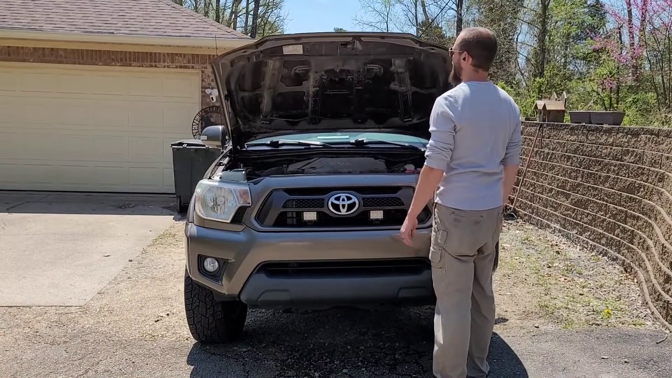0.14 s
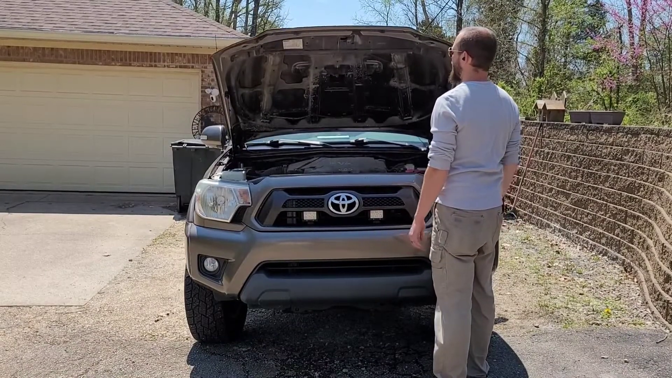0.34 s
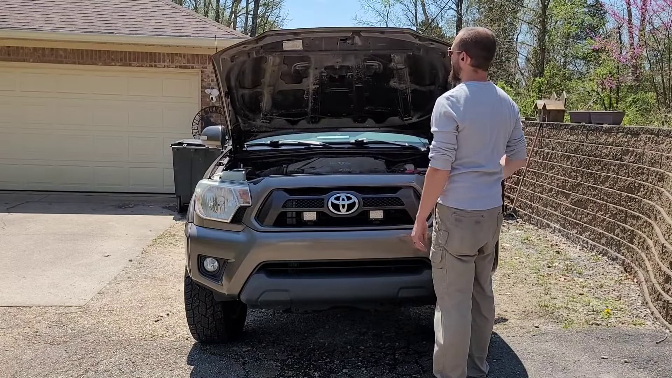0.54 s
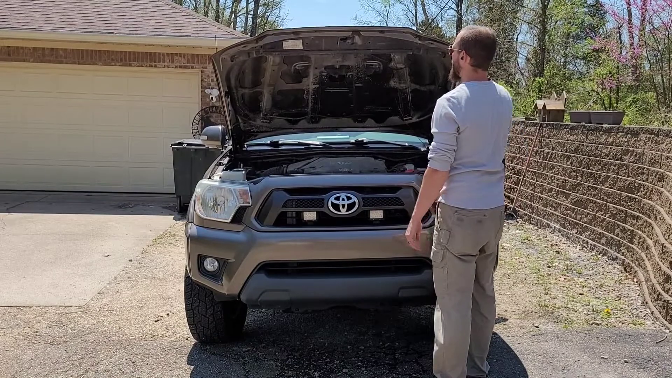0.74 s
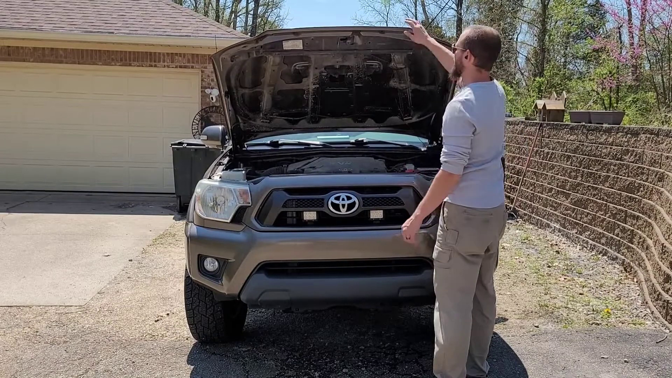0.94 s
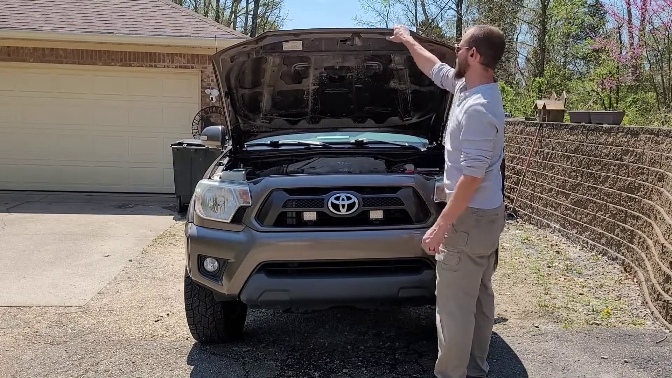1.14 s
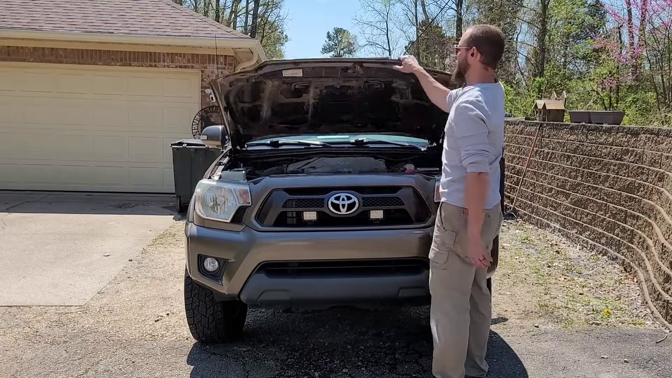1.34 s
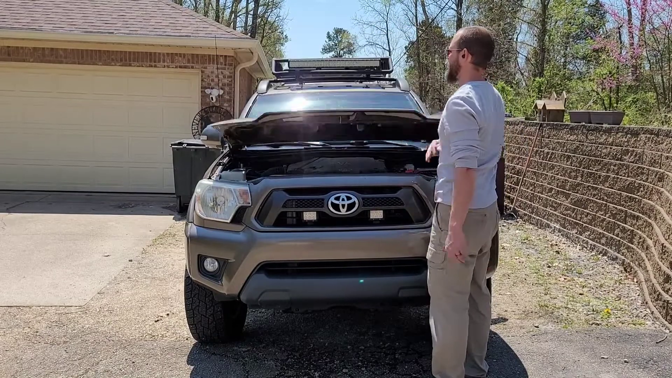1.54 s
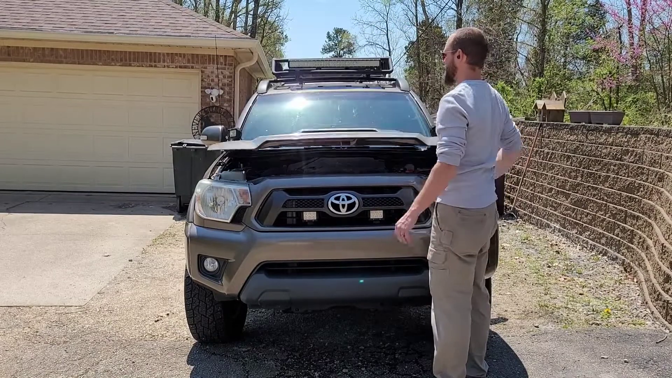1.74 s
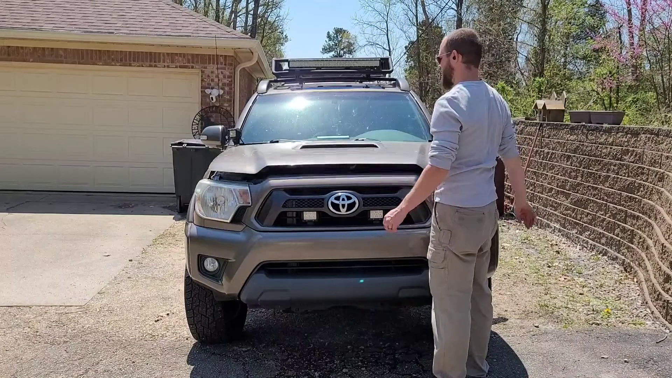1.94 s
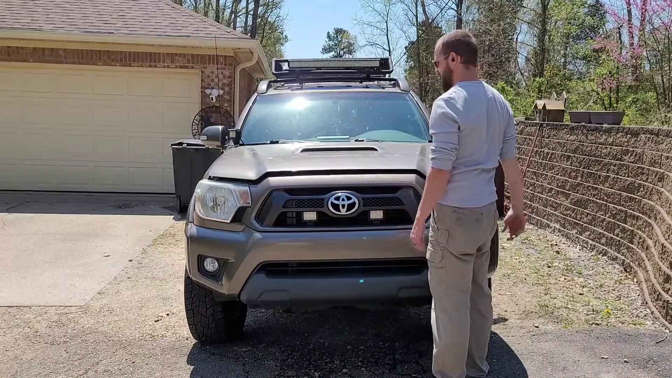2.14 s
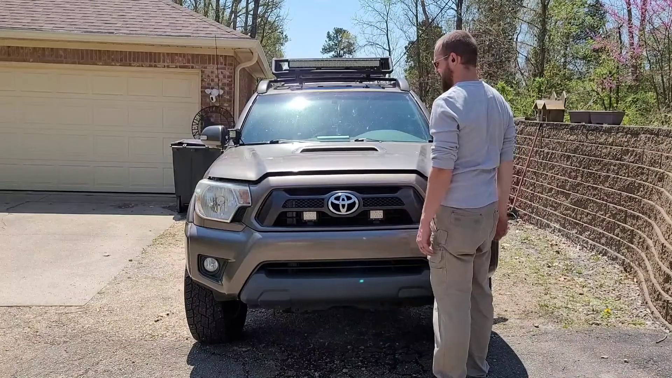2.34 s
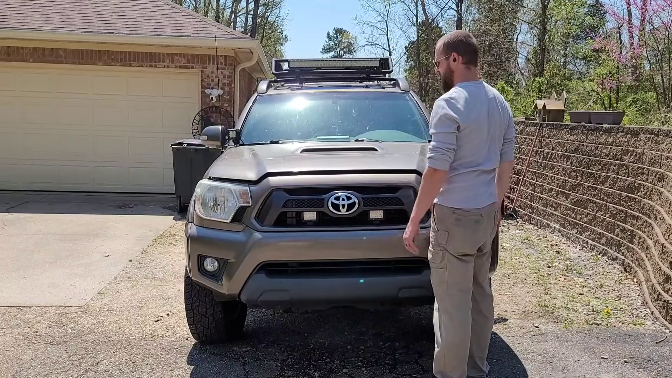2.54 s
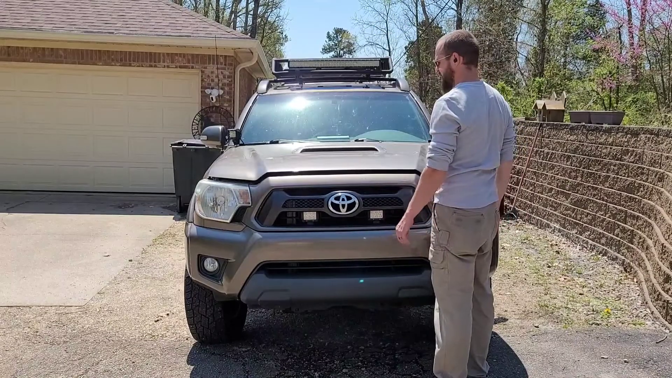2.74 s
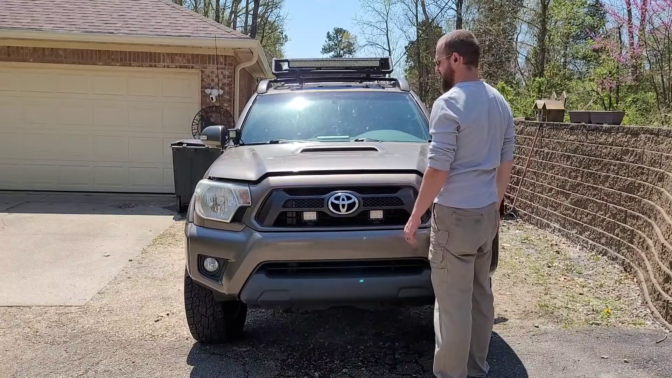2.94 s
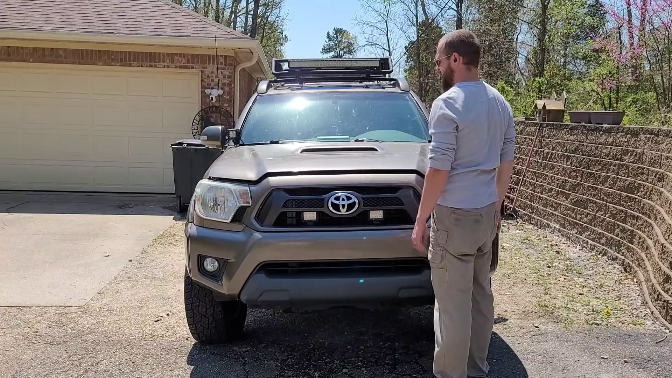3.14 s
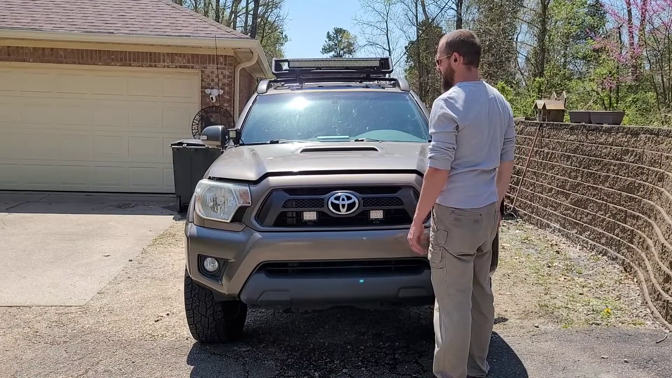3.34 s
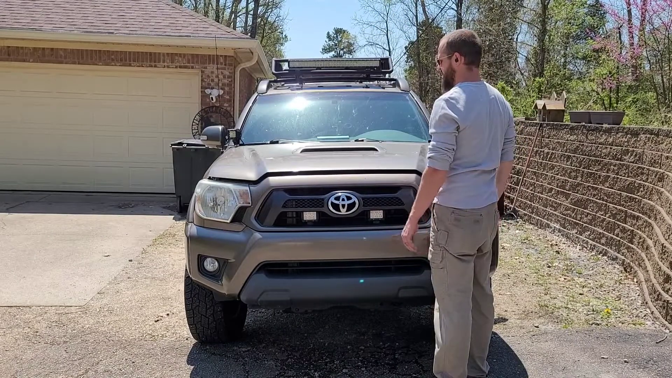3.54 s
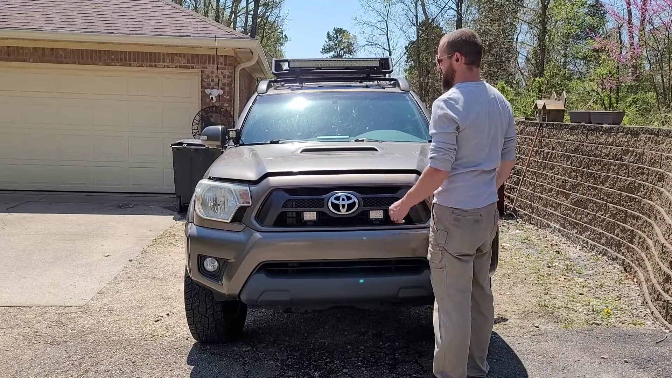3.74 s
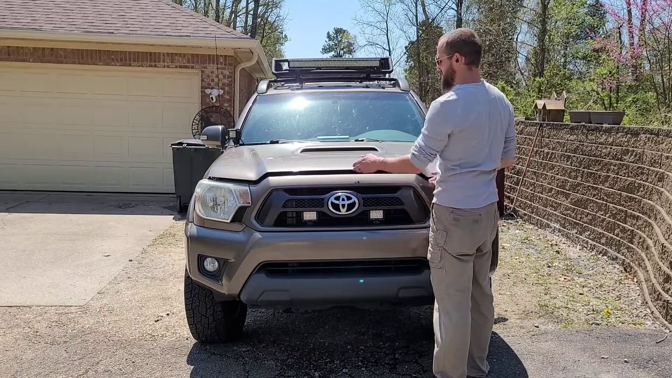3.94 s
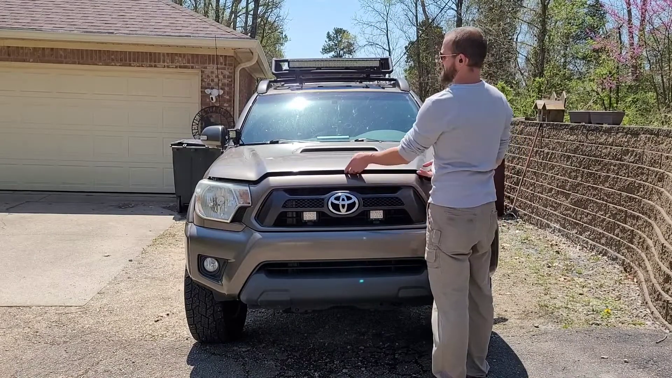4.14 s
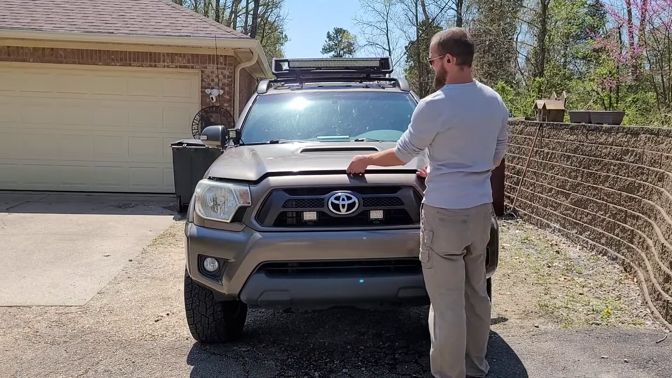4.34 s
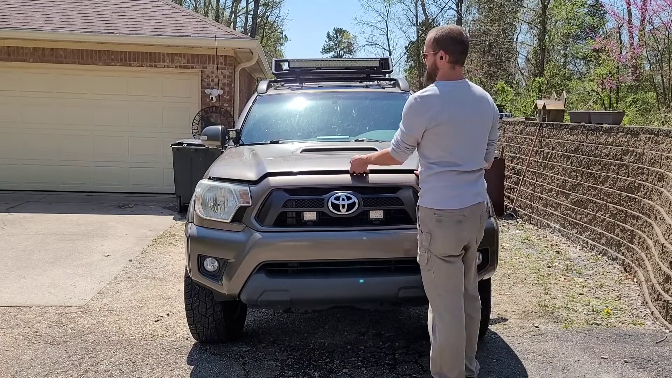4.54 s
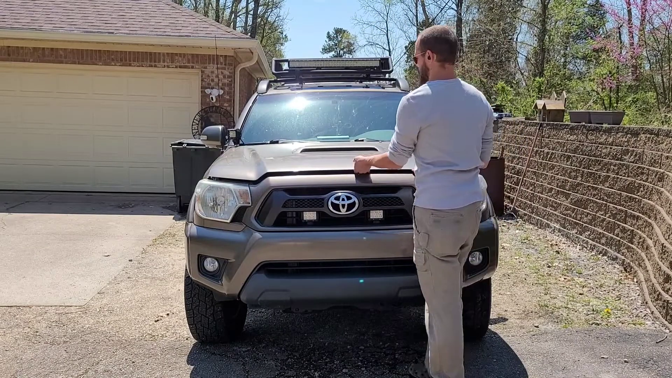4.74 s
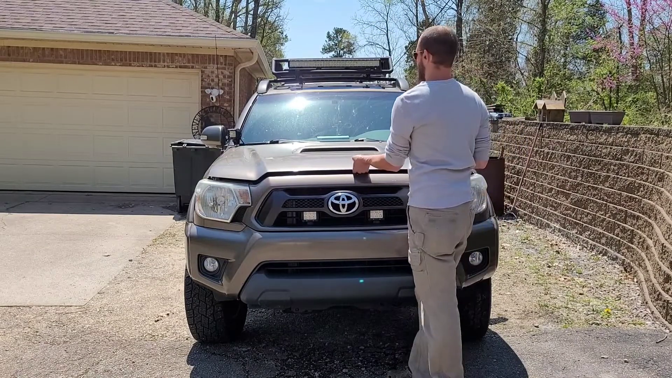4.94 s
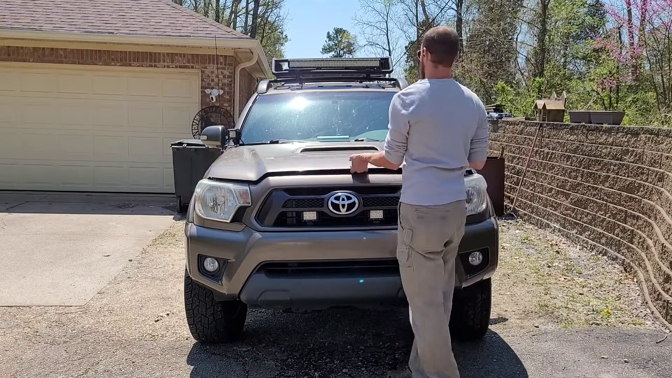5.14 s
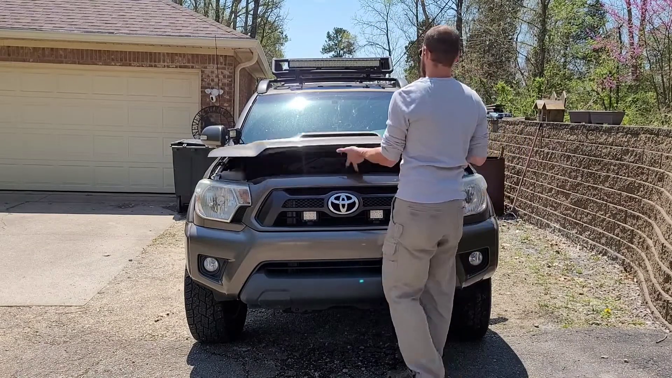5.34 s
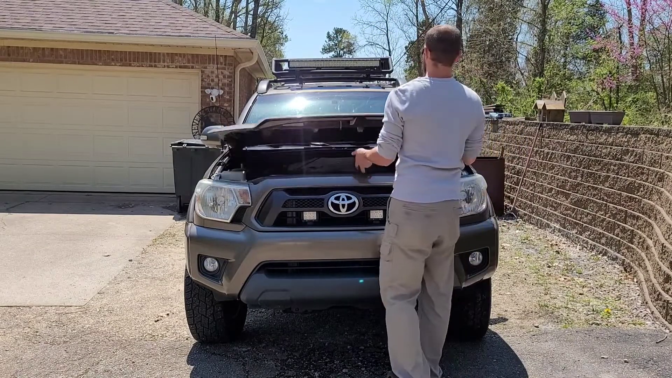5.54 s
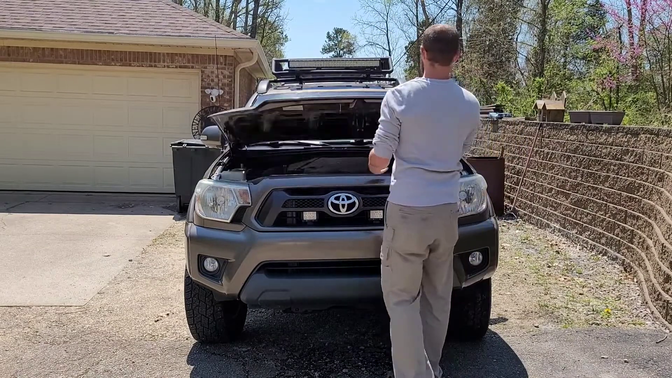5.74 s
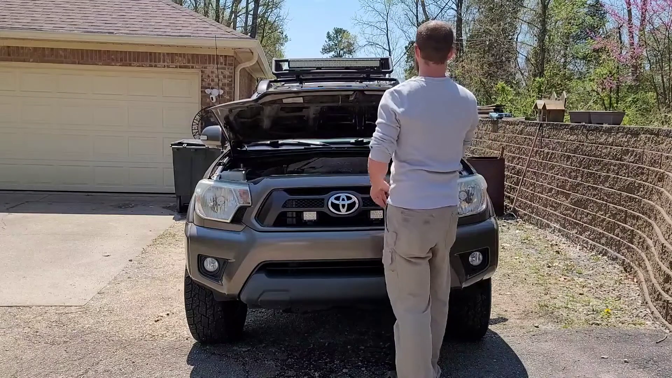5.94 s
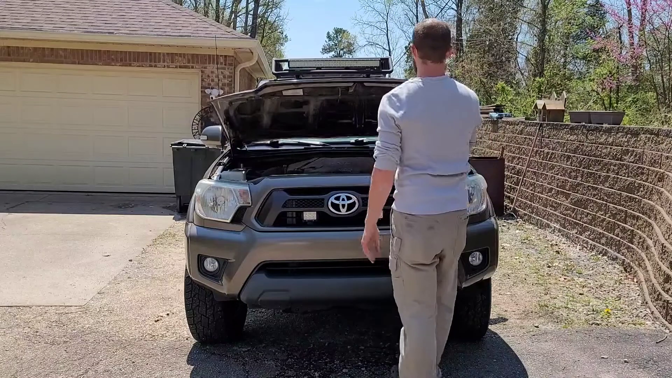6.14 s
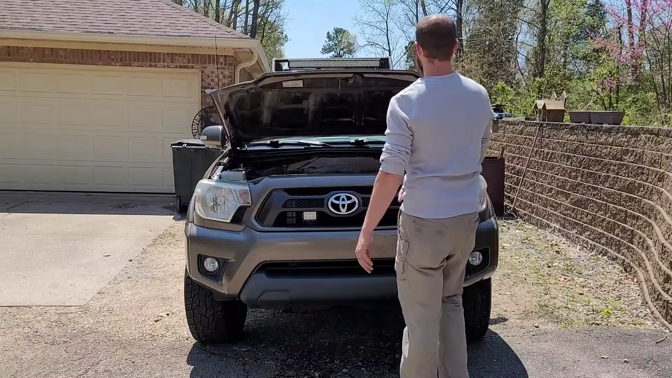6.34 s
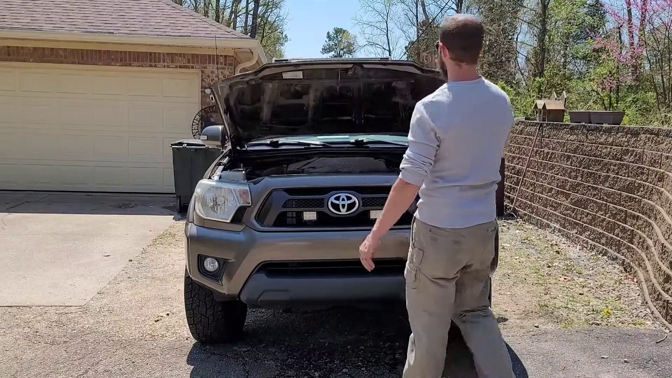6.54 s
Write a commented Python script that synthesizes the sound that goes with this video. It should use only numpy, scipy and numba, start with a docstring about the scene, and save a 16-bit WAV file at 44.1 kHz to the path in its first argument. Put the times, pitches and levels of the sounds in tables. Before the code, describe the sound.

Heard by a phone a few metres away outdoors: low soft bumps on sheet metal, a firmer knock, a short squeak, then a deep, loud hood bang with a clattering ring and scattered echo. Faint birds and a distant murmur follow. Light latch ticks and tiny squeaks lead to a moderate metal pop, soft strut hiss and scuffs, ending with a crisp click and a little low breeze.

```python
"""Birds whistle and chip beside scuffs and a breeze on the microphones; then knocks ring a steel truck hood.
It is pulled down and slammed, unlatched by hand and lifted again, a few metres from a phone.
Rattling contacts drive decaying sheet-metal modes; gliding tones make the latch squeaks and the birds.
Shaped noise makes strut hiss, scuffs, breeze and a far town murmur with a hum.
A garage wall and a scattered yard tail throw hood and birds back."""
import sys
import numpy as np
from scipy import signal
from scipy.fft import rfft, irfft, next_fast_len
from scipy.io import wavfile
from scipy.ndimage import uniform_filter1d
from numba import njit

SR = 44100
rng = np.random.default_rng(int(sys.argv[2]) if len(sys.argv) > 2 else 0)


def convert_level_to_amplitude(level_db):
    """Map a level in decibels to its linear amplitude factor."""
    exponent = np.asarray(level_db, float) / 20
    return 10 ** exponent


def output_pcm(signal):
    """Save a mono or channel-first signal as 16-bit PCM at the path in sys.argv[1].

    Samples are clipped to [-1, 1] before scaling.
    """
    pcm = np.clip(np.atleast_2d(signal).T, -1, 1) * 32767
    wavfile.write(sys.argv[1], SR, np.round(pcm).astype(np.int16))


N = 291314
T = np.arange(N) / SR
# borders of the four parts of the metal, low to high: front end, drum, panel, clank: edge_hz
PART_EDGES_HZ = (18, 160, 700, 2000, 4300)


def unit(x):
    """Scale to rms 1."""
    return x / np.sqrt(np.mean(x ** 2))


def colour(x, points):
    """Filter by a spectrum of (hz, db) points, joined straight over log frequency."""
    hz, db = np.transpose(points)
    size = next_fast_len(N)
    f = np.maximum(np.arange(size // 2 + 1) * SR / size, 1)
    gain = convert_level_to_amplitude(np.interp(np.log(f), np.log(hz), db))
    return irfft(rfft(x, size) * gain, size)[..., :N]


def walk(rate):
    """Random levels held 1 / rate s and slewed twice."""
    k = int(SR / rate)
    steps = np.repeat(rng.standard_normal(N // k + 1), k)
    return 1.3 * uniform_filter1d(uniform_filter1d(steps, k), k)[:N]


def sides(pan_db):
    """Left and right gains; pan_db is left minus right."""
    return convert_level_to_amplitude(np.array([pan_db, -pan_db]) / 2)


def fade(t, t60_s):
    """Exponential decay by 60 dB in t60_s."""
    return np.exp(-np.log(1000) * t / t60_s)


def swells(rows):
    """Gain over time: swells build and fade at steady dB rates, and their powers add."""
    t = T[::44]
    power = 0
    for s, db, rise, fall in rows:
        drop_db = np.where(t < s, rise * (s - t), fall * (t - s))
        power = power + convert_level_to_amplitude(db - drop_db) ** 2
    return np.interp(T, t, np.sqrt(power))


def notes(rows, waver, flutter_db, count=1):
    """Gliding notes, quick at first and then level, that waver in pitch and strength."""
    overtone_top_hz = 3600
    out, wobble = np.zeros(N), 1 + waver * walk(110)
    for s, length, from_hz, to_hz, db, *step_db in rows:
        i, u = int(s * SR), np.linspace(0, 1, int(length * SR))
        hz = (to_hz + (from_hz - to_hz) * (1 - u) ** 2) * wobble[i:i + len(u)]
        phase = 2 * np.pi * np.cumsum(hz) / SR
        tone = np.sin(phase)
        for k in range(2, count + 1):
            if k * to_hz < overtone_top_hz:
                tone += convert_level_to_amplitude(k * step_db[0]) * np.sin(k * phase)
        out[i:i + len(u)] += convert_level_to_amplitude(db) * np.sqrt(2) * np.sin(np.pi * u) ** 0.18 * tone
    return out * convert_level_to_amplitude(flutter_db * walk(70))


def contacts():
    """Knocks and taps in time order; a harder contact feeds the higher parts of the metal more."""
    # knocks on the hood: start_s, strength_db, hardness_db, damping_x,
    # note_hz of the struck spot, note_db over the strength
    knocks = [(0.296, -40.5, -22.5, 0.54, 327, -1.5), (0.317, -36.5, -31, 0.69, 327, 10),
              (0.374, -35.5, -37, 1.35, 351.5, 2.5), (0.439, -46, -33, 1.08, 312, 4.5),
              (1.063, -28.5, -19, 1.12, 1300, -5), (1.078, -26.5, -34, 1.18, 686, 2),
              (1.149, -36, -55, 1.54, 657, 4), (1.956, -18, -6, 0.71, 377, 1),
              (1.984, -12.5, 3.5, 1.52, 374, 5), (2.003, -12, -11, 2.56, 383, 2),
              (2.034, -21, -10.5, 0.6, 371.7, 0.5), (2.09, -22.5, 0.5, 4.8, 364, 4),
              (2.159, -26, 1.5, 1.14, 372, 9), (2.19, -35, -12, 1.3, 885, 15),
              (2.249, -31.5, -22, 1.55, 376, 9), (4.019, -49, -12, 2.64, 490, 0.5),
              (4.19, -48, 2, 1.6, 573, 8.5), (4.53, -60, -2, 1.7, 845, 11.5),
              (4.952, -37, -16, 1.53, 536, -0.5), (5.092, -39.5, -17.5, 1.3, 183, 2),
              (5.466, -24.5, -8, 1.85, 363, -0.5), (5.475, -25, -9.5, 2.17, 430, 12.5),
              (5.495, -46, -25, 1.95, 536.5, 23.5), (5.509, -38.5, -44, 2.36, 215, 16.5),
              (5.618, -69, 10.5, 2.1, 319, 23), (6.579, -71.5, 13, 4.2, 250, 24)]
    # rows for drum, panel, clank and tick: over_db (over the strength), share (of hardness_db)
    hardness = [(-1, 0.0024), (2, 0.19), (-1, .6), (0.5, 1)]
    # light taps of fingers, latch and stay: start_s, panel_db, clank_db, tick_db, damping_x
    taps = [(0.669, -62, -60, -85, 1.8), (1.376, -58, -50, -53.5, 0.57), (1.417, -54, -51.5, -51, 1.5),
            (1.5, -61.5, -66.5, -61.5, 1.6), (4.175, -49, -41.5, -63.5, 1.2), (4.454, -55, -56.5, -53, 1.4),
            (4.473, -54, -47, -69, 2), (4.55, -71, -50, -55, 2.04), (4.605, -54, -64.5, -61, 0.9),
            (4.699, -56.5, -78, -68, 2.9), (5.238, -69, -57, -62, 0.97), (5.265, -73, -59, -60, 2.6),
            (5.394, -58.5, -47.5, -47, 0.85), (5.449, -60, -61, -45, 3.2),
            (5.727, -68.5, -58.5, -65.5, 1.3), (6.329, -67, -61.5, -64, 1.75),
            (6.535, -53.5, -55.5, -52, 0.77), (6.567, -62, -63.5, -41.5, 2.8)]
    knock_pan_db, tap_pan_db, tap_drum_db = -0.7, -2, -4.5
    rows = []
    for s, db, hard, damp, hz, note_db in knocks:
        levels_db = [db + over + share * hard for over, share in hardness]
        rows.append((s, *levels_db, hz, db + note_db, knock_pan_db, damp))
    for s, panel, clank, tick, damp in taps:
        # a note of 0 Hz is silent
        rows.append((s, panel + tap_drum_db, panel, clank, tick, 0, 0, tap_pan_db, damp))
    return sorted(rows)


def rock_front_end(force):
    """Heavy blows also rock the whole front end: smooth shoves that drive its lowest modes."""
    # shoves: start_s, level_db (of the summed push)
    booms = [(0.321, -35), (0.388, -32), (0.45, -36), (0.568, -55), (1.073, -35.5), (1.965, -30),
             (1.994, -15), (2.019, -13.5), (2.096, -18.5), (2.169, -21.5), (2.261, -23.5), (4.963, -40.5),
             (5.1, -42), (5.471, -40), (6.5, -55), (6.546, -43), (6.574, -50)]
    push_peak_s = 0.0074 / 6
    for s, boom_db in booms:
        i = int(s * SR)
        t = T[:min(N - i, SR // 10)]
        shove = t * np.exp(-t / push_peak_s)
        force[0, :, i:i + len(t)] += convert_level_to_amplitude(boom_db) * shove / shove.sum()


def strike(force):
    """Rattling contacts of a few ms push the metal; returns damping, tick envelope and struck notes."""
    contact_s, tick_t60_s, note_t60_s = 0.007, 0.12, 0.16  # both t60 at damping 1
    damping, tick, struck = np.ones(N), np.zeros((2, N)), np.zeros((2, N))
    grit = rng.standard_normal(N)
    for s, drum_db, panel_db, clank_db, tick_db, note_hz, note_db, pan_db, damp in contacts():
        i = int(s * SR)
        t = T[:min(N - i, SR // 2)]
        span = slice(i, i + len(t))
        pan = sides(pan_db)[:, None]
        damp = np.clip(damp, .3, 8)
        rattle = t * np.exp(-2 * t / contact_s) * grit[span] * pan
        rattle = rattle / np.sqrt(np.sum(rattle ** 2) / 2)
        force[1:, :, span] += convert_level_to_amplitude(np.array([drum_db, panel_db, clank_db]))[:, None, None] * rattle
        damping[i:] = damp  # holds until the next contact
        rise = (1 - np.exp(-3 * t / contact_s)) * pan
        tick[:, span] += convert_level_to_amplitude(tick_db) * rise * fade(t * damp, tick_t60_s)
        # the struck spot gives its own short note
        note = np.sin(2 * np.pi * note_hz * t) * fade(t * damp, note_t60_s)
        struck[:, span] += convert_level_to_amplitude(note_db) * rise * note
    return damping, tick, struck


def drag(force):
    """Uneven slipping contact while hood and latch move drives panel and clank."""
    # drags of hood and latch: peak_s, peak_db, rise_db_per_s, fall_db_per_s (levels before the slip level)
    drags = [(1.2, -50.5, 432, 170), (1.39, -50.5, 463, 50), (1.47, -68, 60, 70.2),
             (1.8, -66.5, 150, 305.5), (2.22, -41.5, 295.2, 124), (4.2, -43, 872, 450),
             (4.23, -61.5, 277.8, 50.6), (4.48, -55, 309, 485), (4.535, -53, 900, 400),
             (4.64, -64, 170, 118.8), (4.85, -62.5, 207.4, 110), (5.55, -57.5, 600, 505),
             (5.78, -68.5, 64.7, 37.04)]
    # fingers rub the latch steel, which rings only the clank modes: same columns
    latch_rubs = [(4.25, -61, 198.5, 37.5), (4.62, -91, 100, 71), (5.42, -62.5, 200, 100),
                  (5.56, -71, 199, 66.5), (5.76, -67.5, 80, 91)]
    slip_db, clank_db = -28, -8.5
    slips = rng.standard_normal(N) * convert_level_to_amplitude(slip_db + 1.4 * walk(200))
    force[2:] += convert_level_to_amplitude(np.array([0, clank_db]))[:, None, None] * swells(drags) * slips
    force[3] += swells(latch_rubs) * slips


def metal_modes(count=190, spread=0.93):
    """Main modes of the hood and the many small ones between: hz, t60_s, part, complex gain per side."""
    # main hood modes: pitch_hz, level_db (relative within a part), t60_s (at damping 1, capped below)
    main_modes = [(59.2, -3, 0.73), (106.3, 3.5, 0.29), (377, 7.5, 0.26), (483.5, 6.5, 0.21), (541, 0, 0.9),
                  (716, 0, 0.78), (908, 2, 1.4), (968, -4.5, 0.38), (1210, -22, 0.43), (1297, -13, 0.41),
                  (1480, -27.5, 0.29), (1500, -16, 0.45), (1610.6, -13.5, 0.42), (1700, -28, 0.5),
                  (2010, -15.5, 0.27), (2350, -15.5, 0.11), (2330, -9, 0.16), (2850, -15, 1.5),
                  (2900, -20, 1.2), (3311, -51, 5.0), (3680, -12, 0.32), (3879, -23, 0.25),
                  (4050, -21, 1.0), (3967, -28.5, 0.26)]
    # curve for the many small panel modes: same columns
    sheet = [(35, -10, 0.18), (79, -10.5, 0.98), (150, -1.5, 0.4), (222, -5.5, 0.5), (302, -6, 0.59),
             (600, -2, 0.33), (1070, 0, 0.19), (1500, -5, 0.25), (2160, -5.5, 0.75), (4177, -14.5, 0.13)]
    chance = rng.random(count)
    at, sheet_db, sheet_t60 = np.transpose(sheet)
    hz = at[0] + (at[-1] - at[0]) * ((np.arange(count) + chance) / count) ** 1.4
    small = [hz] + [np.interp(np.log(hz), np.log(at), c) for c in (sheet_db, sheet_t60)]
    hz, db, t60 = np.hstack([np.transpose(main_modes), small])
    # neighbouring parts share the modes near their border
    blurred_hz = hz * np.exp(0.1 * rng.standard_normal(len(hz)))
    part = np.minimum(np.searchsorted(PART_EDGES_HZ[1:], blurred_hz), 3)
    part_power = [np.sum(convert_level_to_amplitude(db[part == k]) ** 2) / 2 for k in part]
    gain = convert_level_to_amplitude(db) / np.sqrt(part_power)
    # each mode radiates its own pattern, so the two microphones differ most in the middle range
    skew = spread * np.minimum(hz / 500, (500 / hz) ** 0.23) * rng.standard_normal(len(hz))
    phase = np.array([skew, -skew]) + 2 * np.pi * rng.random(len(hz))
    # thin steel loses its higher modes sooner
    return hz, np.clip(t60, .05, 11 / np.sqrt(hz)), part, gain * np.exp(1j * phase)


@njit
def ring(force, part, turn, loss, gain, damping):
    """Each mode is pushed by the force of its part and loses energy at the damping of the moment."""
    out = np.zeros((2, force.shape[2]))
    for m in range(len(turn)):
        for c in range(2):
            z, p = 0j, np.exp(1j * turn[m])
            for i in range(force.shape[2]):
                z = z * p * (1 - loss[m] * damping[i]) + force[part[m], c, i]
                out[c, i] += (gain[c, m] * z).imag
    return out


def hood(crack_db=-6):
    """Contact forces ring the sheet-metal modes; the treble is a dense noise tick that fades."""
    # spectrum of the tick: edge_hz, level_db (per Hz, relative)
    tick_spectrum = [(2060, -29), (3500, -1.5), (3970, -1.5), (5710, -7.5), (7950, -14), (9200, -8),
                     (10900, -15.5), (12100, -13.5), (16000, -27)]
    force = np.full((4, 2, N), 1e-18)
    rock_front_end(force)
    damping, tick_envelope, struck = strike(force)
    drag(force)
    for k in range(4):
        band = signal.butter(1, PART_EDGES_HZ[k:k + 2], "band", fs=SR, output="sos")
        force[k] = signal.sosfilt(band, force[k])
    hz, t60_s, part, gain = metal_modes()
    metal = ring(force, part, 2 * np.pi * hz / SR, np.log(1000) / (t60_s * SR), gain, damping)
    # grains largely shared by both sides
    grains = rng.standard_normal(N) + .45 * rng.standard_normal((2, N))
    tick = tick_envelope * unit(colour(grains * convert_level_to_amplitude(0.78 * walk(480)), tick_spectrum))
    return metal + tick + struck + convert_level_to_amplitude(crack_db) * force[3]


def clicks(t60_s=0.0017):
    """Lone contacts of latch and stay: noise of a millisecond or two, almost without ring."""
    # bare metal clicks: start_s, level_db (before the band filter), left_minus_right_db
    click_rows = [(0.6714, -56, 1), (1.5024, -35, -10), (4.0203, -57.5, -9), (4.1921, -33, 0),
                  (4.4732, -40, -2), (5.2395, -43, -19.5), (5.2465, -63, -10.5), (5.4468, -26, 6),
                  (6.538, -32, -2), (6.569, -16, -6)]
    out, t = np.zeros((2, N)), T[:SR // 50]
    grits = rng.standard_normal((len(click_rows), len(t)))
    for (s, db, pan_db), grit in zip(click_rows, grits):
        i = int(s * SR)
        out[:, i:i + len(t)] += convert_level_to_amplitude(db) * sides(pan_db)[:, None] * grit * fade(t, t60_s) / 2
    return signal.sosfilt(signal.butter(1, (1500, 10000), "band", fs=SR, output="sos"), out)


def latch():
    """Stick-slip tones of dry hinges and latch lever, uneven and broken; small parts give short faint tones."""
    # hinge and latch squeaks: start_s, length_s, pitch_hz, level_db,
    # overtone_step_db (harmonic k lies k steps from the first)
    squeak_rows = [(1.446, 0.11, 1147, -57.5, -7), (1.521, 0.098, 784, -58.5, -22),
                   (4.097, 0.077, 1125, -70, 2), (4.146, 0.033, 1397, -70, 6),
                   (4.216, 0.033, 1488, -62.5, 1), (4.26, 0.035, 1500, -67, 1.5),
                   (4.285, 0.037, 1500, -69, 1.5), (4.323, 0.041, 1535, -67.5, -0.5),
                   (4.352, 0.038, 1450, -71.5, 0)]
    # short faint tones of small steel parts: start_s, length_s, pitch_hz, level_db
    small_part_rows = [(4.82, .06, 1750, -73.5), (5.103, 0.041, 8260, -76), (5.1, 0.036, 10900, -70.5),
                       (5.533, 0.11, 2770, -68), (5.53, .05, 1660, -64), (5.618, 0.028, 2100, -67)]
    squeaks = [(s, length, hz, hz, db, step) for s, length, hz, db, step in squeak_rows]
    small_parts = [(s, length, hz, hz, db) for s, length, hz, db in small_part_rows]
    return notes(squeaks, .02, 5, count=3) + notes(small_parts, .003, 3)


def yard(x, t60_s, tail_db, wall_db):
    """One smeared slap from the garage wall and a scattered tail, duller than the direct sound."""
    wall_s = 0.092
    t = T[:SR]
    tail = fade(t, t60_s) * (t > .012)
    slap = np.exp(-np.abs(t - wall_s) / 0.0071)
    echo = 0
    for envelope, db in ((tail, tail_db), (slap, wall_db)):
        envelope = envelope / np.sqrt(np.sum(envelope ** 2))
        echo = echo + convert_level_to_amplitude(db) * envelope * rng.standard_normal((2, SR))
    wet = signal.fftconvolve(x.mean(axis=0)[None], echo, axes=1)[:, :N]
    # long waves reach both microphones alike
    mid = colour(wet[0], [(100, -0.5), (400, 1.5), (3000, -5.5), (12000, -11)])
    side = colour(wet[1], [(100, -13.5), (400, 2), (3000, -1.5), (12000, -10)])
    return x + (mid + side * np.array([[1], [-1]])) / np.sqrt(2)


def song():
    """Whistles and short chips: single tones that glide upward."""
    # one bird's rising whistles and another's lower ones: start_s, length_s, level_db
    whistles, low_whistles = [(0, .19, -63), (.3, .23, -62), (2.335, .2, -65.5), (2.655, 0.24, -65.5)], [(2.37, 0.058, -72.5), (2.66, 0.099, -74),
                                                (2.95, .088, -75.5), (3.28, 0.064, -72)]
    # glide of each kind: from_hz, to_hz
    whistle_hz, low_hz = (2360, 2743), (1440, 1740)
    # short chips that bend up a little: start_s, end_hz, level_db
    chip_rows = [(0, 1028, -65), (.06, 2060, -68), (.11, 2060, -72), (.23, 3530, -67.5), (.5, 2050, -72),
                 (3.07, 3000, -78), (3.215, 3113, -70), (3.24, 3586, -73), (3.32, 3070, -71),
                 (3.38, 2250, -76.5), (3.46, 2610, -81), (3.48, 3460, -74), (3.54, 3524, -69),
                 (3.61, 3010, -72), (3.69, 2230, -75.5), (3.75, 2626, -75.5), (3.78, 3490, -69),
                 (3.84, 3520, -64.5), (3.91, 3060, -72.5), (3.91, 2227, -80.5), (3.1, 2550, -78.5),
                 (3.55, 2600, -84), (3.8, 2620, -75), (3.86, 3050, -75), (3.95, 3080, -74.5),
                 (4.25, 2100, -68), (4.37, 1860, -72), (4.4, 2510, -72), (4.421, 3400, -67)]
    chip_s, chip_bend = 0.037, .035
    rows = [(s, length, *whistle_hz, db) for s, length, db in whistles]
    rows += [(s, length, *low_hz, db) for s, length, db in low_whistles]
    rows += [(s, chip_s, hz * (1 - chip_bend), hz, db) for s, hz, db in chip_rows]
    return rows


def twitter(count=30):
    """Far birds: faint chips at random times, pitches and levels."""
    # range of chip pitches: from_hz, to_hz
    pitch_range = (2460, 3400)
    # range of chip starts: from_s, to_s
    time_range = (3.0, 5)
    chip_s, chip_bend, softest_db = 0.06, .035, -83.5
    when, pitch, size = rng.random((count, 3)).T
    start_s = time_range[0] + (time_range[1] - time_range[0]) * when
    end_hz = pitch_range[0] + (pitch_range[1] - pitch_range[0]) * pitch
    return [(s, chip_s, f * (1 - chip_bend), f, softest_db + 6 * z) for s, f, z in zip(start_s, end_hz, size)]


def hoarse_call():
    """A hoarse, rough call: each throat tone wavers about its pitch and throbs at random on its own."""
    # a hoarse far call: time_s, upper_db, lower_db (upper and lower pair of throat tones)
    caw = [(3.05, -80, -92.5), (3.072, -87.5, -65.5), (3.104, -59, -67.5), (3.124, -61.5, -73.5),
           (3.202, -59, -66), (3.258, -74, -63), (3.38, -73, -77)]
    # its throat tones, low to high: pitch_hz, width_hz, level_db (relative within a pair)
    throat = [(1270, 120, -13.5), (1500, 197, 3), (1730, 180, 2.5), (1940, 120, 6)]
    s, *levels_db = np.transpose(caw)
    edge = np.clip(np.minimum(T - s[0], s[-1] - T) / 0.007, 0, 1)
    upper_db, lower_db = (np.interp(T, s, db) for db in levels_db)
    tones = []
    for hz, width, db in throat:
        throb = convert_level_to_amplitude(db + 5.7 * walk(90))
        tones.append(throb * np.sin(2 * np.pi * np.cumsum(hz + .5 * width * walk(150)) / SR))
    lower, upper = unit(tones[0] + tones[1]), unit(tones[2] + tones[3])
    return edge * (convert_level_to_amplitude(lower_db) * lower + convert_level_to_amplitude(upper_db) * upper)


def birds():
    """Whistled notes and one hoarse call, a little to the left."""
    return (notes(song() + twitter(), .012, 2.9) + hoarse_call()) * sides(2.4)[:, None]


def pair(alike):
    """Two noises that share the given part of their power."""
    mid, side = rng.standard_normal((2, N))
    return np.sqrt(1 + alike) * mid + np.sqrt(1 - alike) * side * np.array([[1], [-1]])


def strut_hiss():
    """Flickering noise of gas struts and cloth that swells and fades."""
    # spectrum: edge_hz, level_db (per Hz, relative)
    hiss_spectrum = [(1760, -34.5), (3000, 3), (5110, -7.5), (5520, -2.5), (6090, -1.5), (8460, -5),
                     (12400, -6.5), (16000, -19.5)]
    # swells: peak_s, peak_db, rise_db_per_s, fall_db_per_s
    hiss_swells = [(0.0, -75, 50, 35), (.33, -73, -2, 125), (1.1, -64, 300, 250), (1.29, -59, 98, 41),
                   (1.405, -56.5, 248, 250), (1.56, -67, 60, 70), (1.95, -80.5, 8, 203.5),
                   (4.54, -73.5, 68, 86), (5.44, -62, 129, 68), (5.78, -68.5, 18, 150.5),
                   (6.29, -77.5, 20, 12), (6.6, -71, 24.5, 59)]
    hiss = convert_level_to_amplitude(0.5 * walk(16)) * unit(colour(pair(0.27), hiss_spectrum))
    return swells(hiss_swells) * hiss


def scuffs():
    """Flickering low-mid noise of shoes and hands scuffing."""
    # spectrum: edge_hz, level_db (per Hz, relative)
    scuff_spectrum = [(180, -48), (300, -9), (354, -3), (608, -14.5), (826, -8), (951, -16.5),
                      (1750, -10.5), (5000, -30.5), (6500, -53.5), (11000, -120)]
    # swells: peak_s, peak_db, rise_db_per_s, fall_db_per_s
    scuff_swells = [(0.0, -63.5, 50, 30), (.342, -55, 70, 130), (.67, -68, 10, 140), (1.11, -56, 200, 80),
                    (1.43, -52.5, 74, 63), (1.9, -64.5, 40, 120), (3.19, -69, 140, 50), (4.22, -68, 38, 20),
                    (4.54, -65.5, 26, 89), (4.93, -69.5, 26, 63), (5.44, -66, 30, 90),
                    (5.64, -67.5, 110, 16.9), (6.1, -69, 15, 15), (6.6, -63, 25, 50)]
    scuff = convert_level_to_amplitude(1.3 * walk(23)) * unit(colour(pair(0.11), scuff_spectrum))
    return swells(scuff_swells) * scuff


def breeze():
    """Flickering low rumble of moving air on the microphones."""
    # strength of the breeze: time_s, level_db (before the flicker)
    breeze_levels = [(0, -62), (.5, -53), (1.2, -70), (1.43, -55.5), (1.6, -68.5), (2.4, -61), (3.1, -83),
                     (3.6, -68.5), (4.7, -61.5), (5.05, -66), (5.3, -57.5), (5.64, -62), (5.85, -63),
                     (6.4, -68), (6.61, -47)]
    rumble = unit(colour(pair(0.53), [(15, -23.5), (45, 7.5), (90, -0.5), (300, -47.5)]))
    rumble = convert_level_to_amplitude(2.2 * walk(21)) * rumble
    return convert_level_to_amplitude(np.interp(T, *np.transpose(breeze_levels))) * rumble


def town():
    """Far murmur, in part alike on both sides in the bass, with a wavering machine hum."""
    # murmur spectrum: edge_hz, level_db (per Hz, relative)
    murmur_spectrum = [(18, -29), (30, -6), (118, -6), (266, -18.5), (415, -14.5), (1860, -34),
                       (2610, -25.5), (3490, -34.5), (3870, -41), (5310, -35.5), (7090, -55.5),
                       (13000, -49.5), (16000, -58.5)]
    # likeness of left and right: edge_hz, alike (share, below 0 taken as 0)
    likeness = [(60, 0.9), (130, 0.4), (290, 0.9), (640, -0.54), (1410, -0.6), (3100, -0.45), (6820, 0),
                (15000, 0.32)]
    # machine hum: pitch_hz, level_db (before the wavering)
    hum_rows = [(102.3, -70), (129.2, -72.5), (209.9, -74)]
    town_db = -62
    hz, alike = np.transpose(likeness)
    alike = np.clip(alike, 0, .98)
    mid, side = (colour(colour(rng.standard_normal(N), murmur_spectrum),
                        np.transpose([hz, 10 * np.log10(1 + sign * alike)])) for sign in (1, -1))
    murmur = unit(mid + side * np.array([[1], [-1]])) * convert_level_to_amplitude(town_db + 1.2 * walk(3.1))
    hum = 0
    for f, db in hum_rows:
        level = convert_level_to_amplitude(db + walk(1)) * np.sqrt(2)
        hum = hum + level * np.sin(2 * np.pi * f * T + 2.4 * walk(13.0))
    return murmur + hum


def scene():
    """Hood and latch in the yard, birds in wetter trees, air and town around."""
    near = yard(hood() + latch() + clicks(), t60_s=0.51, tail_db=-13, wall_db=-20)
    trees = yard(birds(), t60_s=0.54, tail_db=0.72, wall_db=-15)
    return near + trees + strut_hiss() + scuffs() + breeze() + town()


def band_limit(x):
    """A steep low-pass at the top of the band."""
    return signal.sosfilt(signal.butter(12, 16650, fs=SR, output="sos"), x)


def record(dry):
    """The phone rounds the loudest peaks."""
    mix = np.tanh(0.9 * dry)
    return band_limit(mix)


dry = scene()
out = record(dry)
output_pcm(out)
```